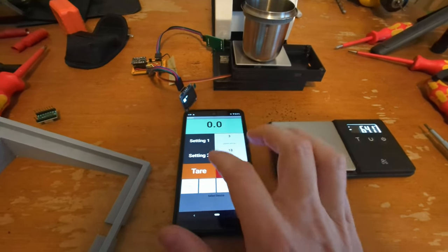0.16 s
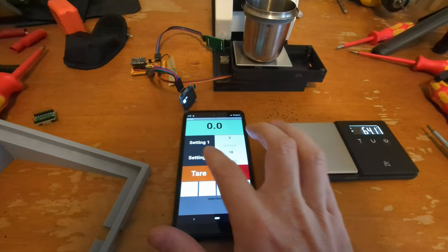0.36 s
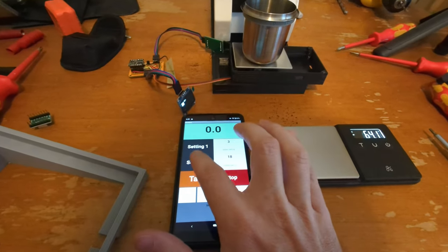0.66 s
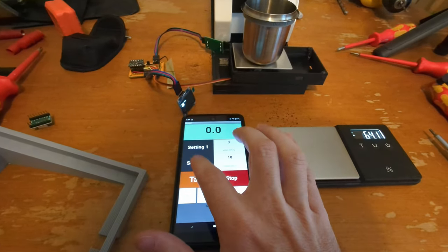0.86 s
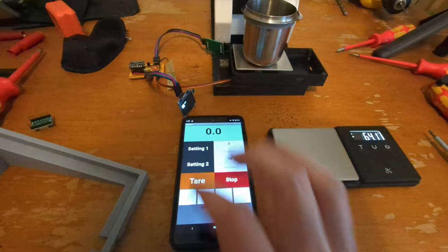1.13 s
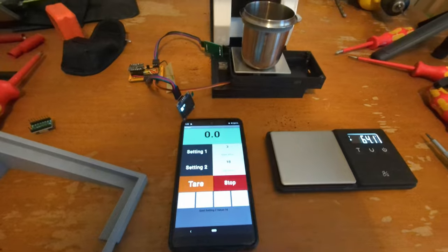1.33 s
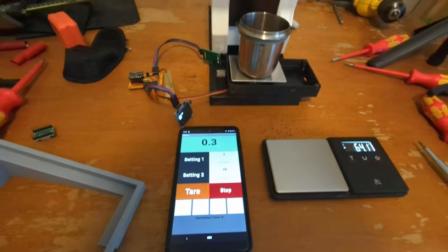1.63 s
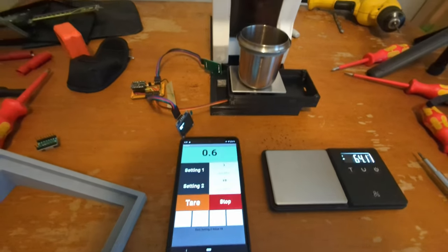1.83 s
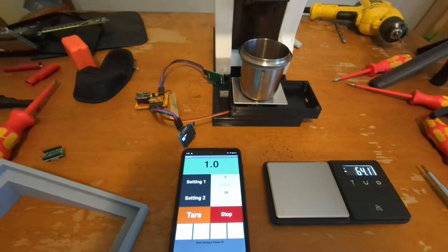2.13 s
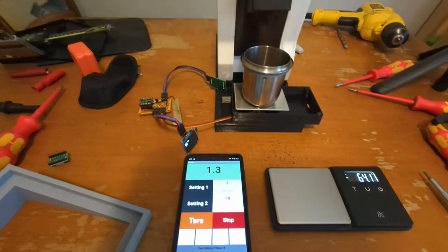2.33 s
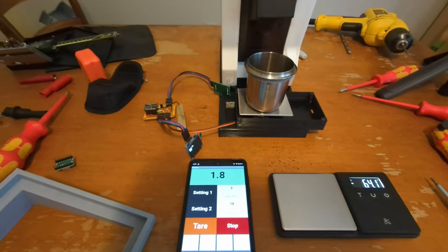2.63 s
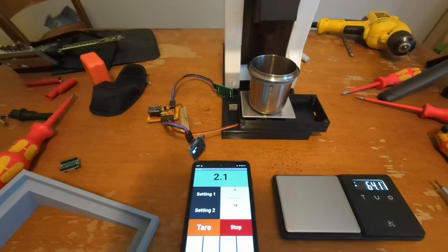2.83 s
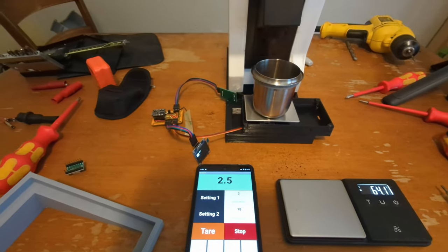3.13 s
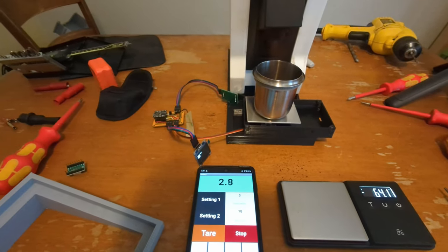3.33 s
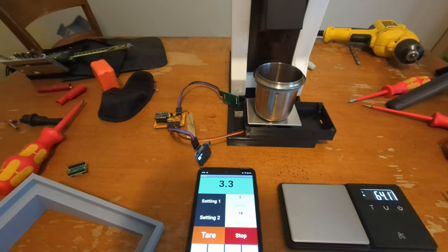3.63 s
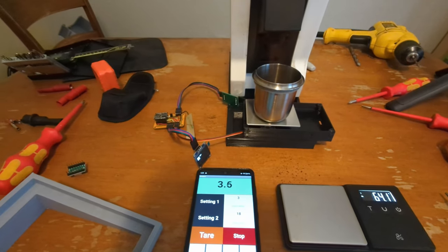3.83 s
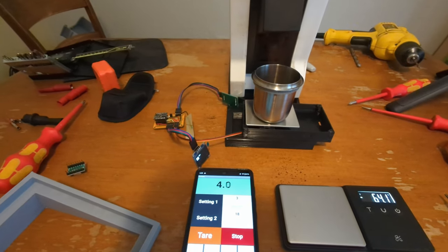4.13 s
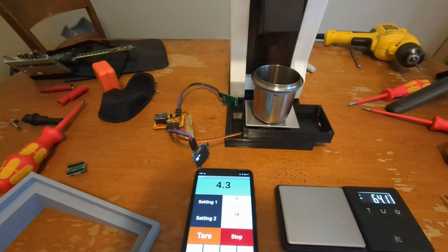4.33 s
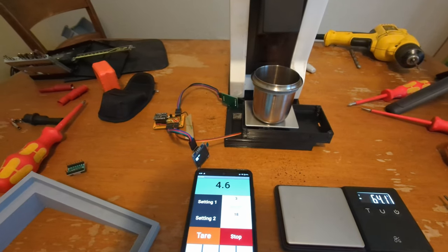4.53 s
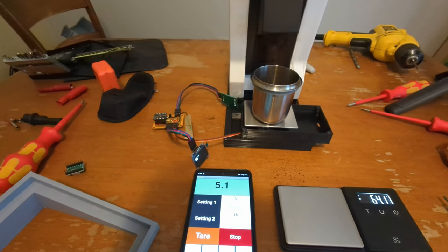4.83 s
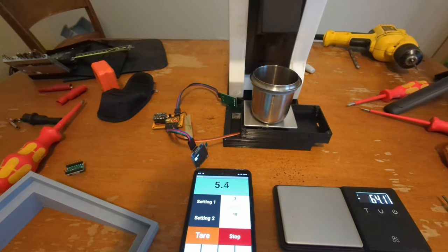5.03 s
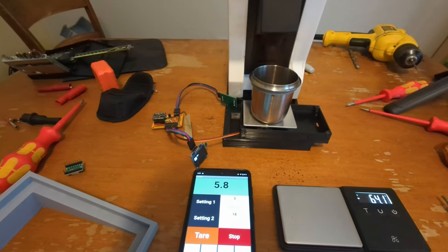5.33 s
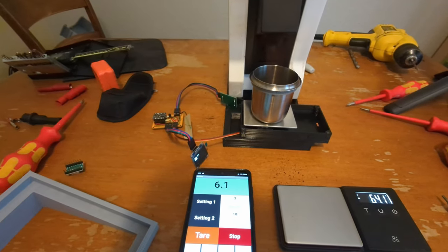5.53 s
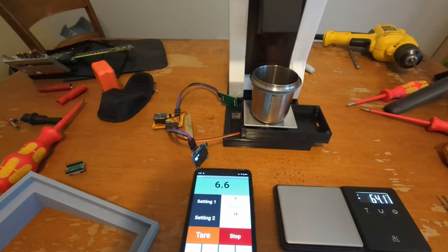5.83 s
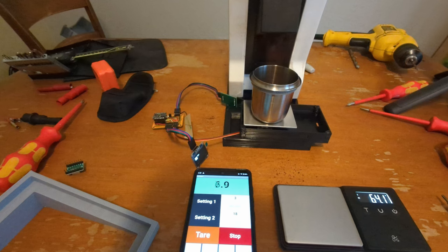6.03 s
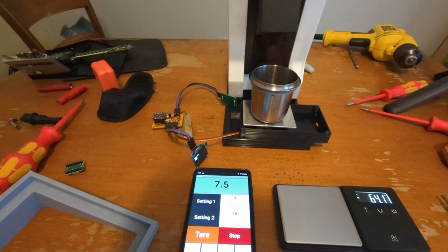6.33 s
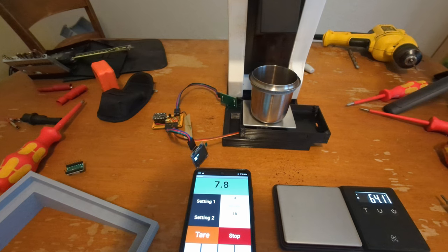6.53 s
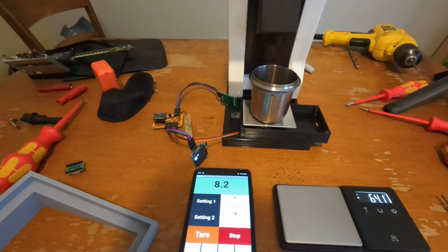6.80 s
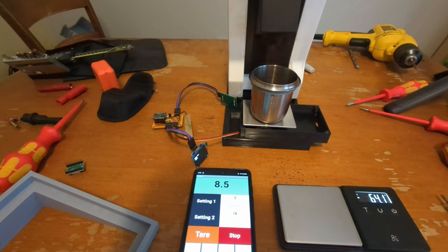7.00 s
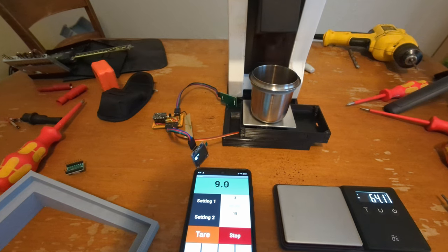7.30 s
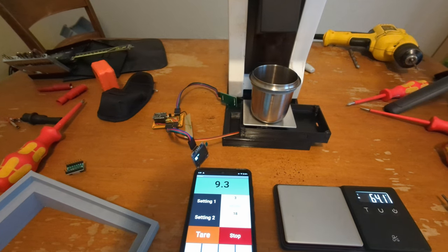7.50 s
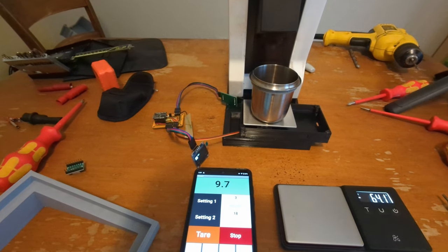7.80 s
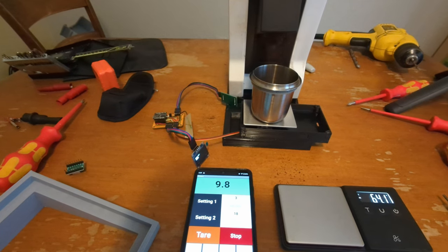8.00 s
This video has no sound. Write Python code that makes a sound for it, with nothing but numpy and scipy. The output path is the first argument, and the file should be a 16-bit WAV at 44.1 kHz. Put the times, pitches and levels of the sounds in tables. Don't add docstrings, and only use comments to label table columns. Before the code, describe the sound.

Near-silent room with a faint low drone, then after about a second an electric coffee grinder bursts on and crunches beans steadily to the end.

```python
import sys
import numpy as np
from scipy import signal
from scipy.fft import rfft, irfft
from scipy.io import wavfile
from scipy.ndimage import uniform_filter1d

SR = 44100
rng = np.random.default_rng(int(sys.argv[2]) if len(sys.argv) > 2 else 0)


def transcribe(signal):
    frames = np.atleast_2d(signal).T
    limited = np.clip(frames, -1, 1)
    pcm = np.round(limited * 32767).astype(np.int16)
    wavfile.write(sys.argv[1], SR, pcm)


def level_to_linear(level):
    exponent = np.asarray(level, float) / 20
    return 10 ** exponent


N = 359856
T = np.arange(N) / SR
HZ = np.fft.rfftfreq(N, 1 / SR) + 1e-3
RING_N = 2 ** 15

SWITCH_S, SWITCH_RISE_S, BITE_S, BITE_RISE_S = 1.040, 0.006, 1.070, 0.0093

# time_s, crushing_db
BEAN_LOAD = [(1.1, -25.5), (1.18, -26), (3.09, -26.5), (3.11, -25.5), (3.68, -27.5), (3.72, -26),
             (4.88, -25.5), (5.25, -27), (5.27, -25.5), (5.94, -26.5), (5.96, -24.5), (6.05, -27),
             (6.27, -25.5), (7.33, -26.5), (7.63, -25.5), (8.16, -26.5)]
# time_s,
# above_rumble_db
JAMS = [(1.14, 4), (1.59, 5), (1.721, 8.5), (1.93, 4.5), (2.23, 5.5), (2.87, 8.5), (3.0, 4.5), (3.1, 3),
        (3.38, 0), (3.68, 2), (3.93, -2), (4.25, 0), (4.42, 6), (4.51, 6.5), (4.88, 5.5), (5.2, 3.5),
        (5.45, 3), (5.66, 3.5), (5.87, 5.5), (5.98, 6), (6.36, 5), (6.52, 7), (6.75, 7), (6.93, 4),
        (7.1, 4.5), (7.35, 1), (7.67, 7), (7.85, 2.5), (8.04, 4)]
# pitch_hz, width_hz, left_db, right_db,
# port_likeness (0-1), left_lead_rad
GRINDER_MODES = [(138, 14, -7.2, -7.3, 0.98, 0.1), (190, 18, -4.9, -7.6, 0.94, 0.2),
                 (251, 56, -5.1, -7.7, 0.96, 0.0), (279, 13, 8.4, 7.7, 0.97, 0.1),
                 (301, 23, -0.1, 1.2, 0.92, 0.1), (329, 14, -5.6, -1.0, 0.82, -0.0),
                 (364, 41, -5.7, -4.7, 0.9, 0.2), (480, 62, -7.9, -15.7, 0.85, 0.4),
                 (572, 81, -8.0, -13.1, 0.9, 0.6), (755, 159, -9.0, -14.0, 0.65, 0.4),
                 (969, 42, 4.0, -1.8, 0.73, -0.6), (1010, 24, 1.8, -4.3, 0.76, -0.2),
                 (1086, 24, -1.7, -3.4, 0.28, -0.8), (1335, 124, 13.0, 8.3, 0.37, 0.8),
                 (1521, 26, 14.0, 9.3, 0.39, -1.1), (1539, 269, 14.4, 6.1, 0.35, -0.6),
                 (1726, 113, 10.2, 4.0, 0.81, -0.1), (1849, 176, 13.1, 4.6, 0.82, 0.2),
                 (2007, 31, 4.7, 4.1, 0.57, 0.1), (2076, 187, 6.8, -1.3, 0.52, 0.0),
                 (2252, 192, 13.5, 4.9, 0.24, 0.6), (2269, 32, 14.9, 1.6, 0.34, 0.8),
                (2389, 106, 7.3, -17.2, 0.02, 1.2), (2543, 158, 3.5, -3.0, 0.59, -0.4),
                (2708, 126, 8.7, -4.6, 0.46, 0.7), (2787, 82, 3.3, -0.2, 0.31, 2.6),
                (3013, 245, 7.2, -4.4, 0.25, -1.9), (3160, 70, 8.2, -0.1, 0.44, -1.4),
                (3251, 70, -11.1, -3.0, 0.21, -0.9), (3349, 244, 2.1, -7.2, 0.28, -0.5),
                 (3981, 156, -3.2, -10.6, 0.11, -1.3), (4219, 81, 1.5, -8.5, 0.09, -2.7),
             (4659, 215, -0.6, -14.8, 0.5, 2.3), (4842, 58, -16.7, -8.1, 0.21, 2.3),
             (4968, 884, -18.6, -5.7, 0.36, 2.6), (5220, 482, 2.3, -18.3, 0.53, 2.6),
             (5337, 107, 4.9, -9.2, 0.61, 2.5), (6217, 184, -5.2, -11.5, 0.14, -1.2),
             (6406, 40, -0.3, -14.7, 0.43, 2.9), (6530, 239, -3.3, -8.4, 0.31, -1.4),
             (6802, 389, -3.2, -10.3, 0.23, -2.7), (7092, 180, -8.1, -11.4, 0.05, -0.5),
             (7349, 147, -10.1, -15.7, 0.39, -2.2),
                 (8293, 206, -5.5, -23.7, 0.24, 1.3), (8497, 186, -5.3, -26.2, 0.23, 1.5),
              (9276, 281, -26.2, -19.9, 0.14, -2.4), (10500, 388, -14.4, -16.7, 0.41, 1.8),
              (10789, 163, -8.5, -14.7, 0.39, -2.5), (11333, 113, -16.8, -21.5, 0.13, 2.4),
              (11632, 1646, -20.7, -21.1, 0.05, -3.0), (11969, 118, -10.8, -16.0, 0.44, -2.8),
              (12180, 139, -13.1, -22.3, 0.44, 2.8), (13491, 489, -20.7, -17.2, 0.13, -0.0),
              (14270, 217, -17.7, -18.1, 0.1, 1.0), (14452, 1450, -20.7, -20.4, 0.07, -0.0),
              (15162, 115, -25.4, -24.5, 0.4, -3.0)]
# pitch_hz, left_db, right_db, port_likeness (0-1)
BROAD_SOUND = [(30, -42, -40, .3), (50, -31.2, -29.1, 0.33), (100, -17.0, -15.4, 0.98),
               (200, -16.4, -15.4, 0.94), (420, -10.0, -10.8, 0.8), (850, -27.9, -13.0, 0.57),
               (1200, 1.9, -4.9, 0.24), (2500, -17.1, -16.7, 0.39), (3650, -7.0, -14.8, 0.2),
               (5800, -8.5, -15.8, 0.22), (8000, -8.7, -16.3, 0.16), (10000, -18.6, -20.4, 0.11),
               (13000, -19.8, -19.0, 0.04), (15600, -25.7, -28.9, 0.17)]
# low_hz, high_hz
ZONES = [
    (40, 150),
    (170, 380),
    (400, 840),
    (900, 3600),
    (3600, 20000),
]
# start_s, peak_db, pitch_hz, left_minus_right_db
SNAPS = [
    (1.2034, -25, 6540, 10.0),
    (2.3042, -29, 5220, 6.5),
    (3.239, -25, 8030, 15),
    (7.4295, -30, 6500, 7.5),
]
# start_s, peak_db, pitch_hz
KNOCKS = [(1.072, -30.5, 301), (1.979, -34, 574), (2.824, -38, 483), (2.987, -37, 407), (4.127, -32.5, 546),
          (4.329, -35, 509), (4.487, -35, 544), (5.216, -36, 579), (5.249, -33, 360), (5.411, -35, 557),
          (5.486, -31.5, 353), (5.565, -33, 730), (5.866, -51, 454), (6.307, -35, 477), (6.499, -39, 600),
          (6.774, -31.5, 532), (7.163, -42, 340)]
# pitch_hz, left_db, right_db
LOW_AIM = [(600, -1, -1.5), (990, 1.5, 1), (1420, 0.5, 1), (1700, -2.5, -3.5), (2150, .5, 1),
           (2740, -1, -4), (3000, 1.5, 1), (5030, -1, -4), (5400, -1.5, 0), (5970, 6, -1), (6540, 1, -7),
           (7350, -0.5, 0), (8800, 1.5, -3.5), (14000, 0, -0.5)]
TURN_TIMES = [1.3, 2.9]
# pitch_hz, level_db (per Hz)
ROOM_COLOUR = [(20, -30), (50, -15), (104, -1.5), (198, -12), (246, -12), (320, -4), (370, -10), (420, -17),
               (722, -29), (1050, -36), (1300, -30), (2010, -44), (8000, -53), (12500, -49)]
# pitch_hz, port_likeness (0-1)
ROOM_LIKENESS = [(30, .3), (100, 0.83), (400, 0.81), (1500, 0.33), (5000, .1)]
# pitch_hz, level_db (rms)
DRONES = [(59.2, -91), (92, -81), (145, -83), (254, -88), (296.5, -76.5), (343, -73), (593, -100),
          (1200, -101), (1346, -102), (11800, -108)]


def on_hz(hz, at_hz, values):
    return np.interp(np.log(hz), np.log(at_hz), values)


def walk(rate_hz):
    hold = int(SR / rate_hz)
    steps = np.repeat(rng.standard_normal(N // hold + 1), hold)
    return 1.08 * uniform_filter1d(uniform_filter1d(steps, hold), hold)[:N]


def ramp(start_s, rise_s):
    return np.clip((T - start_s) / rise_s, 0, 1)


def swell(time_s, width_s):
    return np.exp(-((T - time_s) / width_s) ** 2)


def port_noise(alike):
    shared, own = rfft(rng.standard_normal((2, N)))
    second = np.conj(alike) * shared + np.sqrt(1 - np.abs(alike) ** 2) * own
    return irfft([shared, second], N)


def grinder():
    crush, grit = crushing_force()
    throb = np.cos(2 * np.pi * 99.9 * T + 0.5 * walk(3))
    forces = [crush * level_to_linear(-33 + 1.3 * walk(4.55)),
              bench_force() * level_to_linear(0.58 * walk(20)),
              crush * level_to_linear(-24 + 1.0 * walk(18)) * cracks(2.55, 0.01),
              crush * level_to_linear(0.4 * walk(25) + 0.5 * throb) * cracks(0.8, 0.003),
              grit * level_to_linear(0.4 * walk(12) + 0.3 * throb) * cracks(1.9, 0.0015)]
    hz = np.fft.rfftfreq(RING_N, 1 / SR) + 1e-3
    power, alike = body(hz)
    drive = port_noise(scattered(hz, alike))
    gain = ringing_gain(power)
    mid_power = (power.sum(axis=0) + 2 * alike.real * np.sqrt(power.prod(axis=0))) / 4
    lead_in = RING_N // 8
    out, below = 0, 0
    for force, (low_hz, high_hz) in zip(forces, ZONES):
        upto = 1 / (1 + (hz / (1.02 * high_hz)) ** 12)
        in_zone = (hz > low_hz) & (hz < high_hz)
        unit = np.sqrt(mid_power[in_zone].sum() / len(hz))
        ring = np.roll(irfft(gain * (upto - below) / unit, RING_N), lead_in, axis=1)
        out = out + signal.fftconvolve(drive * force, ring, axes=1)[:, lead_in:lead_in + N]
        below = upto
    return out


def engaged(slack_db):
    return ramp(SWITCH_S, SWITCH_RISE_S) ** 2 * level_to_linear(slack_db * (1 - ramp(BITE_S, BITE_RISE_S)))


def crushing_force():
    crush_db = np.interp(T, *np.transpose(BEAN_LOAD))
    grit_db = -36.5 + 0.95 * (crush_db + 26)
    return engaged(-11.5) * level_to_linear([crush_db, grit_db])


def bench_force():
    settle_db = 5.5 * np.exp(-np.abs(T - BITE_S) / 1.3)
    jolt_db = 6 * swell(BITE_S + 0.008, 0.008)
    jam_db = sum(up_db * swell(time_s, 0.042) for time_s, up_db in JAMS)
    return engaged(-16) * level_to_linear(-47 + settle_db + jolt_db + jam_db)


def cracks(spread_db, fade_s):
    cracks_per_s = 2500
    sizes = (rng.random(N) < cracks_per_s / SR) * level_to_linear(spread_db * rng.exponential(size=N))
    power = signal.lfilter([1], [1, -np.exp(-1 / (fade_s * SR))], sizes ** 2 + 0.0051)
    return np.sqrt(power / power.mean())


def body(hz):
    at_hz, left_db, right_db, alike = np.transpose(BROAD_SOUND)
    gain = level_to_linear([on_hz(hz, at_hz, left_db), on_hz(hz, at_hz, right_db)])
    power = gain ** 2
    cross = gain[0] * gain[1] * on_hz(hz, at_hz, alike) + 0j
    modes = GRINDER_MODES
    for pitch_hz, width_hz, left_db, right_db, alike, lead_rad in modes:
        shape = 1 / (1 + (2 * (hz - pitch_hz) / width_hz) ** 2) ** 2
        power = power + shape * level_to_linear([[left_db], [right_db]]) ** 2
        cross = cross + shape * level_to_linear(left_db + right_db) * alike * np.exp(1j * lead_rad)
    return power, cross / np.sqrt(power[0] * power[1])


def scattered(hz, alike):
    scatter, band_hz = 0.4, 60
    angles = 2 * np.pi * rng.random(SR // band_hz)
    turns = np.exp(1j * np.repeat(angles, band_hz * N // SR)[:len(HZ)])
    smooth = np.interp(HZ, hz, alike.real) + 1j * np.interp(HZ, hz, alike.imag)
    return smooth + scatter * (1 - np.abs(smooth)) * turns


def ringing_gain(power):
    cepstrum = irfft(np.log(power).mean(axis=0) / 2, RING_N)
    fold = np.r_[1, 2 * np.ones(RING_N // 2 - 1), 1, np.zeros(RING_N // 2 - 1)]
    return np.sqrt(power) * np.exp(1j * rfft(cepstrum * fold).imag)


def splinters():
    out, t = np.zeros((2, N)), np.arange(SR // 50) / SR
    for start_s, peak_db, pitch_hz, pan_db in SNAPS:
        hiss = np.diff(rng.standard_normal(len(t)), prepend=0)
        snap = (np.sin(2 * np.pi * pitch_hz * t) + 0.3 * hiss) * np.exp(-t / 0.0032)
        start = int(start_s * SR)
        out[:, start:start + len(t)] += snap * level_to_linear(peak_db - 5 + np.array([[pan_db], [-pan_db]]) / 2)
    return out


def knocks():
    out, t = np.zeros((2, N)), np.arange(SR // 10) / SR
    peak_s = 0.0099
    thump = t / peak_s * np.exp(1 - t / peak_s)
    for start_s, peak_db, pitch_hz in KNOCKS:
        band = signal.butter(1, [0.93 * pitch_hz, 1.43 * pitch_hz], "bandpass", fs=SR, output="sos")
        rough = signal.sosfilt(band, rng.standard_normal(len(t)))
        ring = np.sin(2 * np.pi * pitch_hz * t) + 0.7 * rough / rough.std()
        start = int(start_s * SR)
        out[:, start:start + len(t)] += level_to_linear(peak_db - 6.5) * thump * ring
    return out


def echoes(x):
    t60_s, echo_db = 0.2, -10
    t = np.arange(RING_N // 2) / SR
    tails = rng.standard_normal((2, len(t))) * level_to_linear(-60 * t / t60_s) * (t > 0.003)
    tails = signal.sosfilt(signal.butter(2, 900, "highpass", fs=SR, output="sos"), tails)
    tails = level_to_linear(echo_db) * tails / np.sqrt((tails ** 2).sum(axis=1, keepdims=True))
    first, second = (signal.fftconvolve(x, tail[None], axes=1)[:, :N] for tail in tails)
    sway = walk(1.2)
    return x + np.cos(sway) * first + np.sin(sway) * second


def tilt(x):
    at_hz, left_db, right_db = np.transpose(LOW_AIM)
    colour = irfft(level_to_linear([on_hz(HZ, at_hz, left_db), on_hz(HZ, at_hz, right_db)]), N)
    short = np.roll(colour, 512, axis=1)[:, :1025] * np.hanning(1025)
    low = signal.fftconvolve(x, short, mode="same", axes=1)
    return low + np.interp(T, TURN_TIMES, [0, 1]) * (x - low)


def windings():
    since_s = np.maximum(T - SWITCH_S, 0)
    tone = np.sqrt(2) * np.sin(2 * np.pi * 120.2 * T + 0.05 * walk(4.1))
    size = ramp(SWITCH_S, 0.035) * (1 - 3.8 * np.exp(-since_s / 0.06))
    level_db = -52.5 + 0.23 * since_s + 1.7 * walk(4.5)
    return tone * size * level_to_linear(level_db + np.array([[0.3], [-0.3]]))


def far_hiss():
    start_s, rise_s, hold_s, fade_db_per_s = 0.64, 0.05, 0.1, 90
    band = signal.butter(2, [1150, 1400], "bandpass", fs=SR, output="sos")
    noise = signal.sosfilt(band, port_noise(np.full(len(HZ), 0.5)))
    fade_db = fade_db_per_s * np.maximum(T - start_s - rise_s - hold_s, 0)
    return noise / noise.std() * ramp(start_s, rise_s) ** 2 * level_to_linear(-83 - fade_db)


def quiet_room():
    alike = on_hz(HZ, *np.transpose(ROOM_LIKENESS))
    air = irfft(rfft(port_noise(alike)) * level_to_linear(on_hz(HZ, *np.transpose(ROOM_COLOUR))), N)
    air = air * level_to_linear(-70) / air.std()
    drones = 0
    for pitch_hz, level_db in DRONES:
        level = np.sqrt(2) * level_to_linear(level_db + 1.5 * walk(9))
        drones = drones + level * np.sin(2 * np.pi * pitch_hz * T + 0.3 * walk(6))
    return air + drones


def scene():
    near = tilt(echoes(grinder() + splinters() + knocks()))
    return near + windings() + far_hiss() + quiet_room()


def low_pass(x):
    return signal.sosfilt(signal.butter(12, 15750, fs=SR, output="sos"), x)


def record(dry):
    mix = np.tanh(1.602 * dry) / 1.588
    return low_pass(mix)


dry = scene()
out = record(dry)
transcribe(out)
```